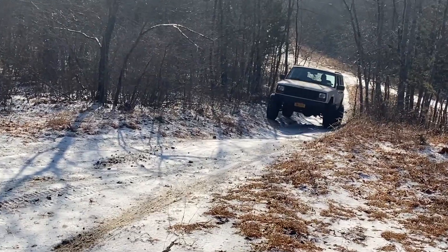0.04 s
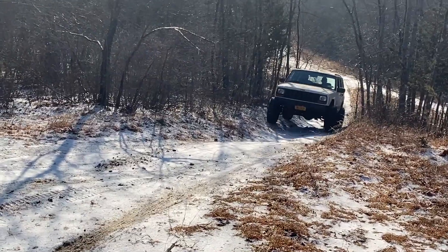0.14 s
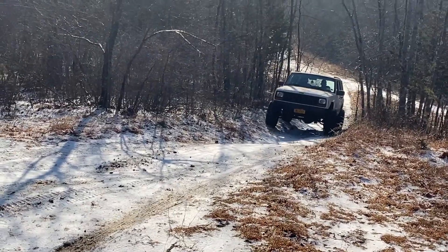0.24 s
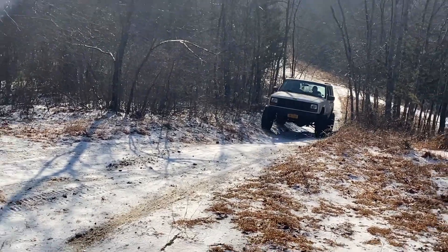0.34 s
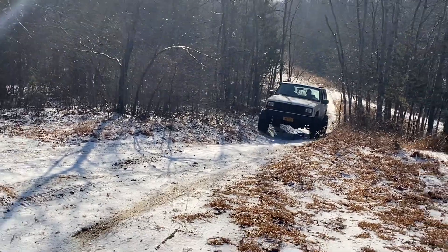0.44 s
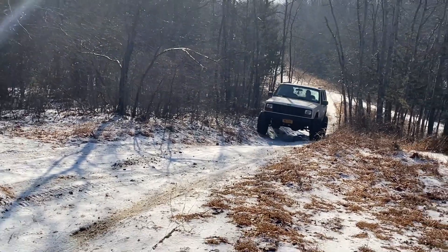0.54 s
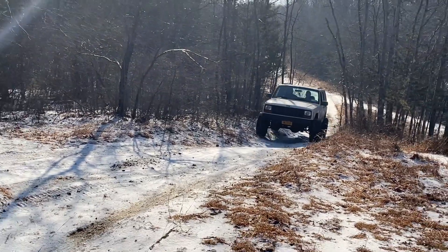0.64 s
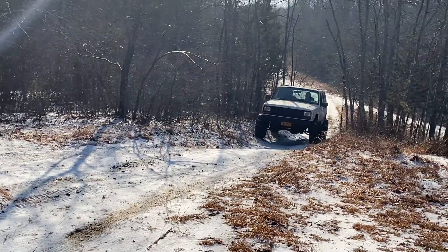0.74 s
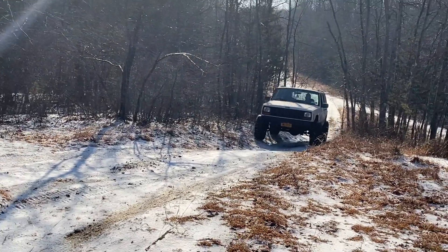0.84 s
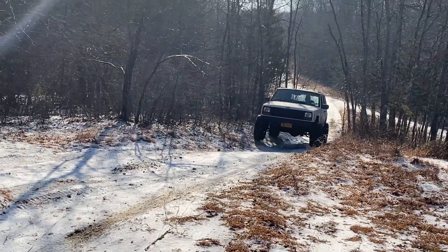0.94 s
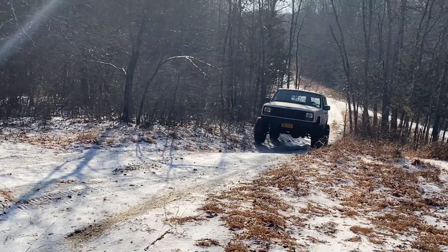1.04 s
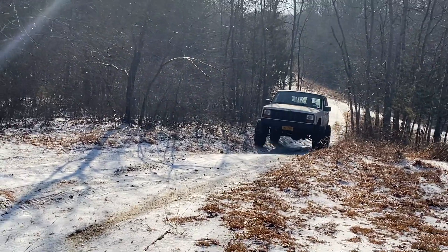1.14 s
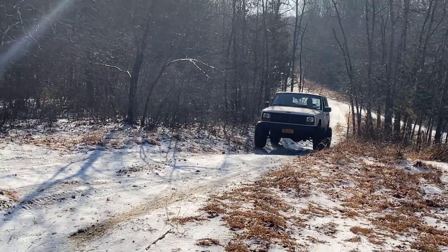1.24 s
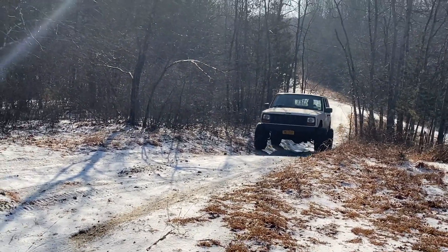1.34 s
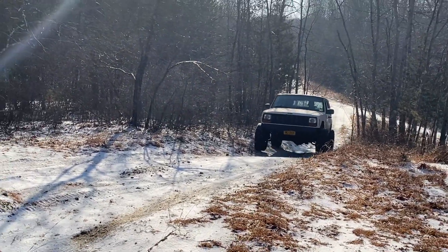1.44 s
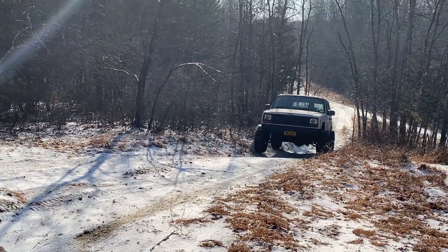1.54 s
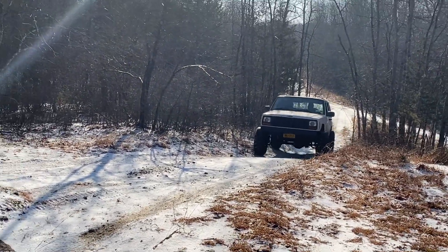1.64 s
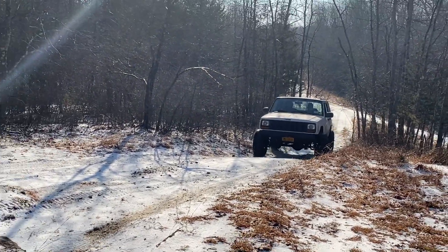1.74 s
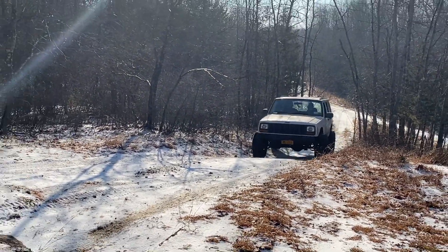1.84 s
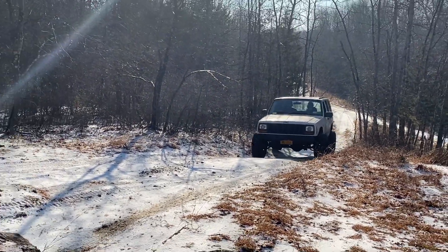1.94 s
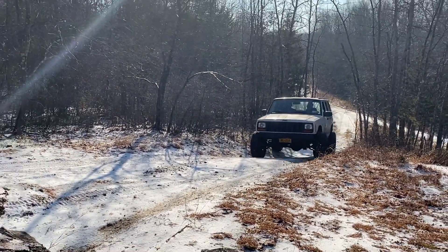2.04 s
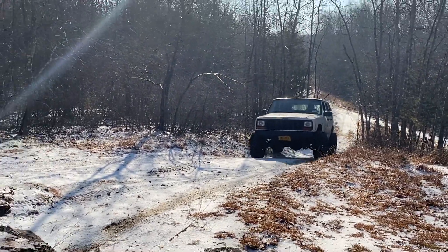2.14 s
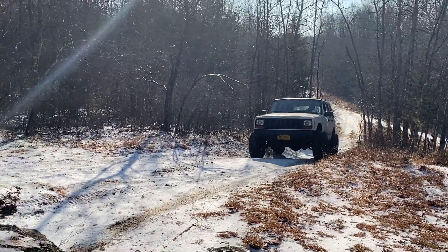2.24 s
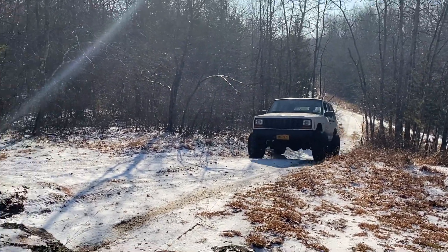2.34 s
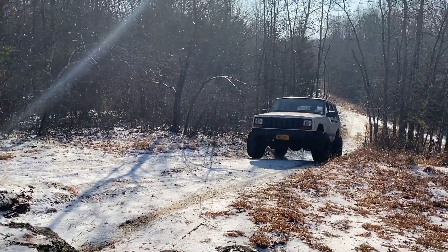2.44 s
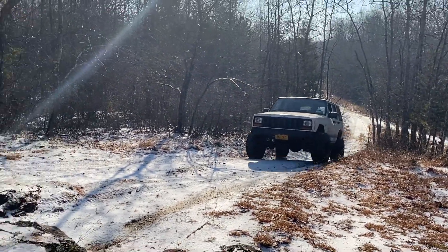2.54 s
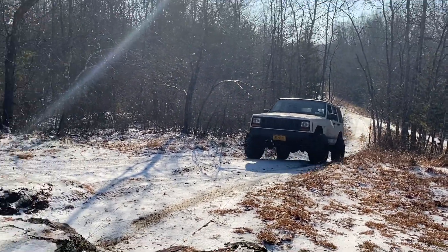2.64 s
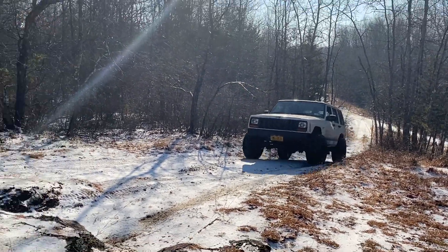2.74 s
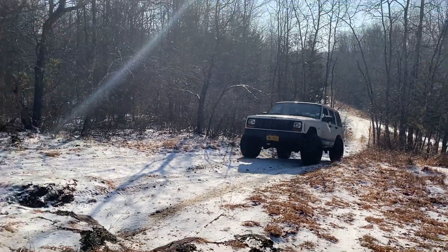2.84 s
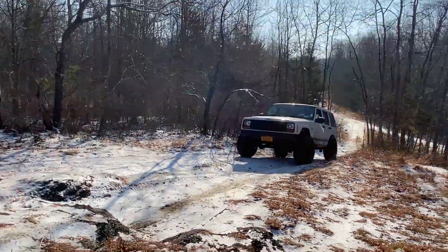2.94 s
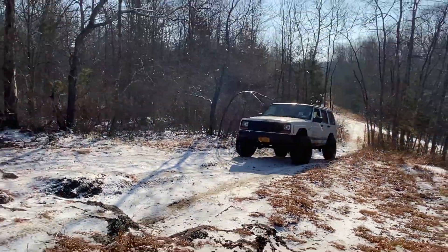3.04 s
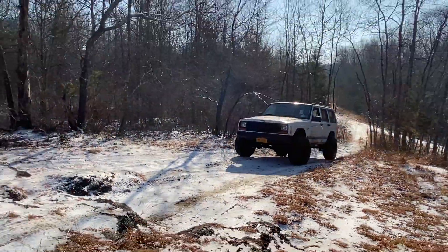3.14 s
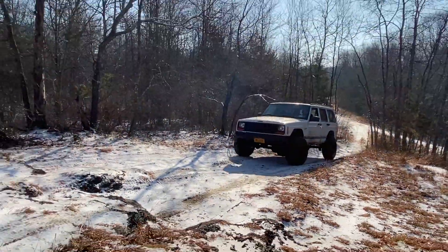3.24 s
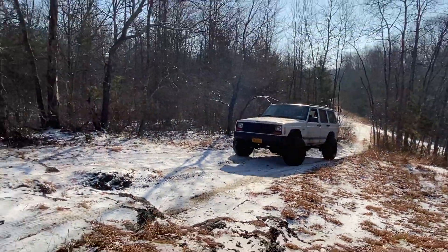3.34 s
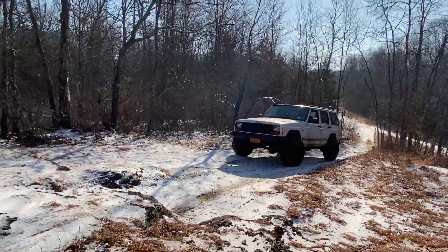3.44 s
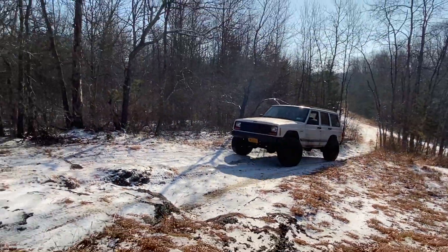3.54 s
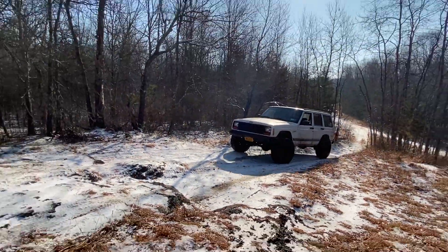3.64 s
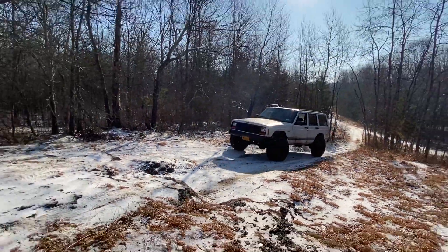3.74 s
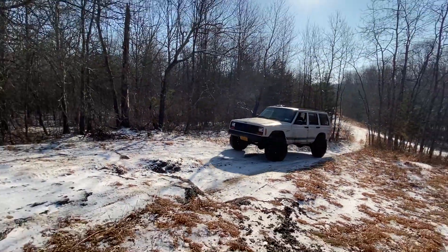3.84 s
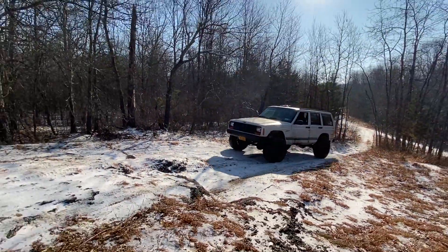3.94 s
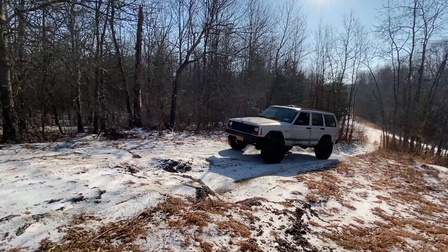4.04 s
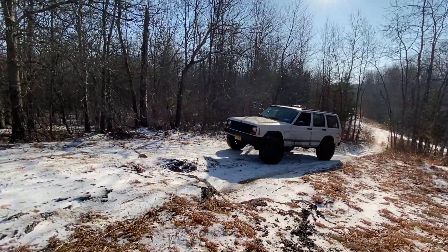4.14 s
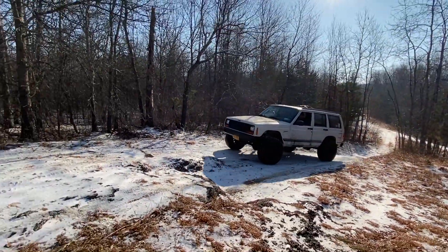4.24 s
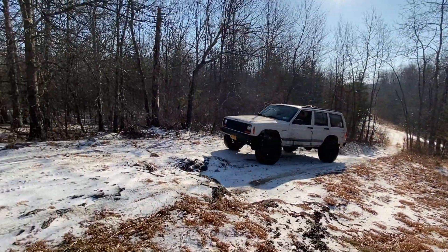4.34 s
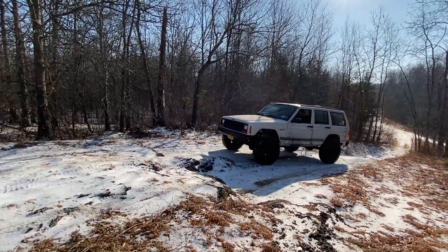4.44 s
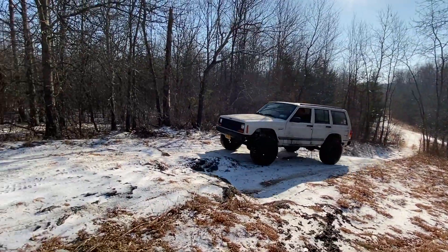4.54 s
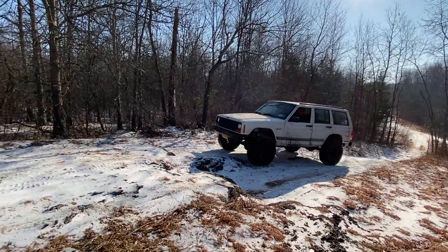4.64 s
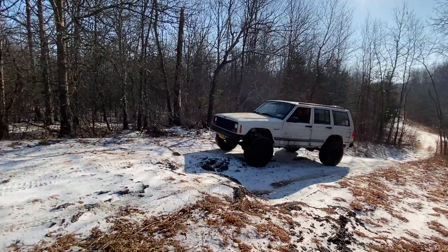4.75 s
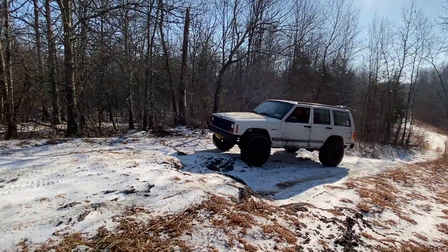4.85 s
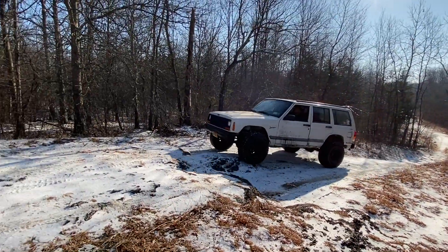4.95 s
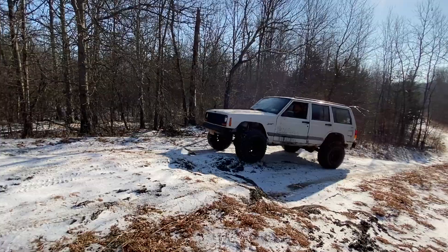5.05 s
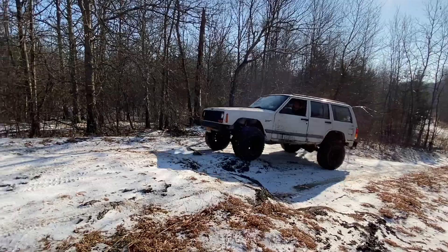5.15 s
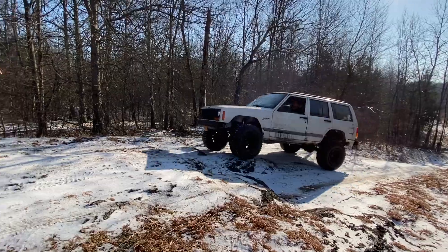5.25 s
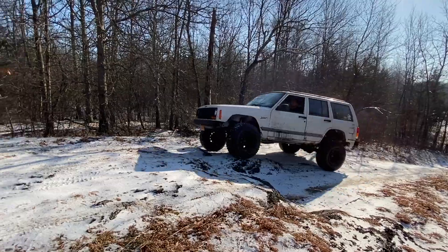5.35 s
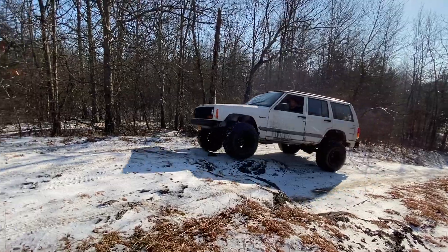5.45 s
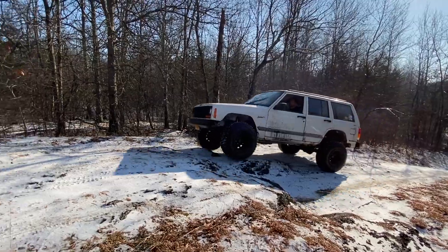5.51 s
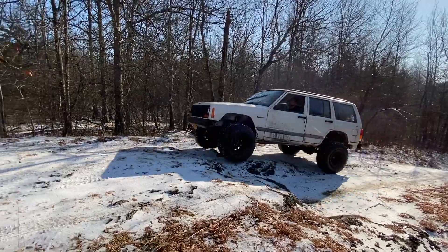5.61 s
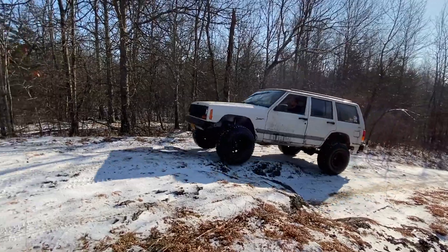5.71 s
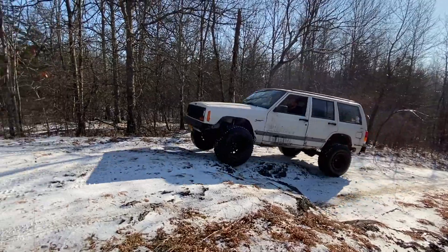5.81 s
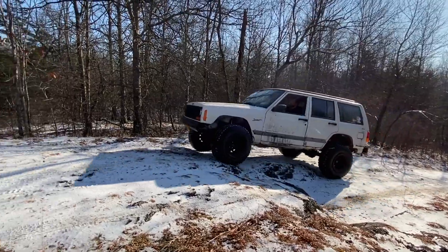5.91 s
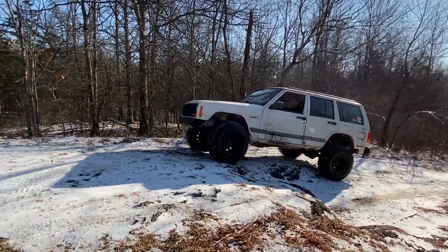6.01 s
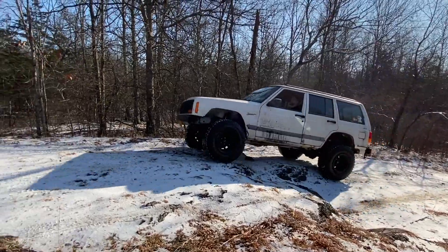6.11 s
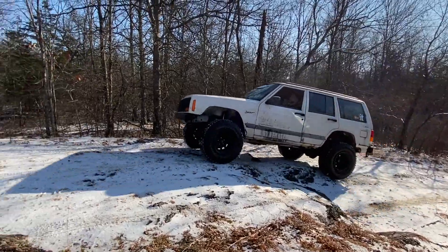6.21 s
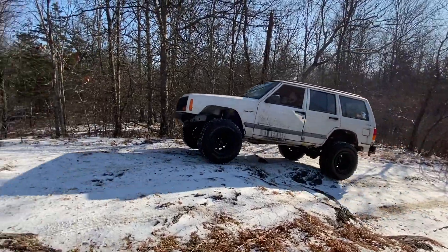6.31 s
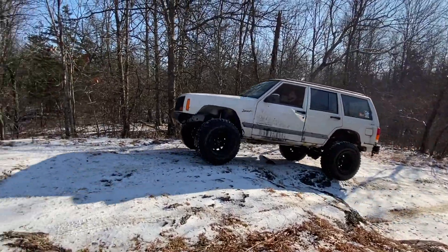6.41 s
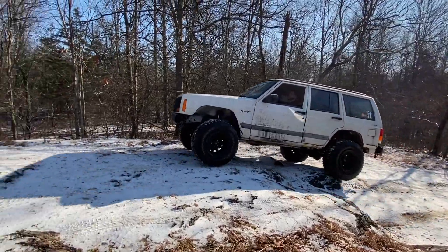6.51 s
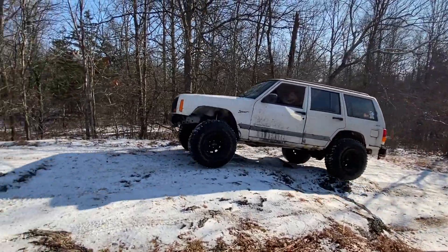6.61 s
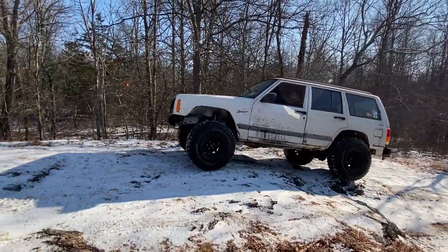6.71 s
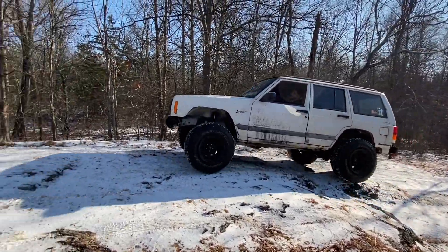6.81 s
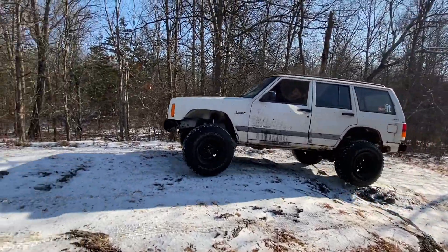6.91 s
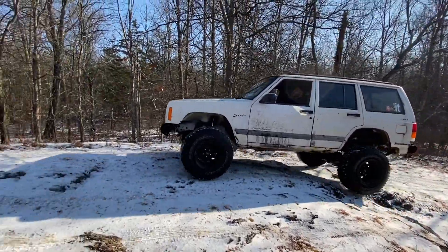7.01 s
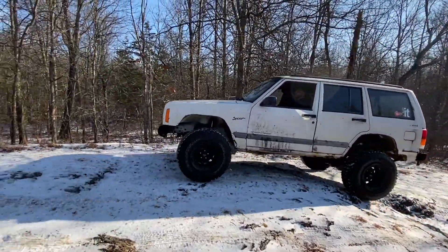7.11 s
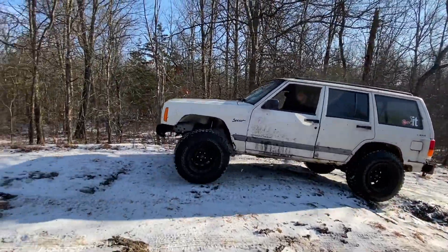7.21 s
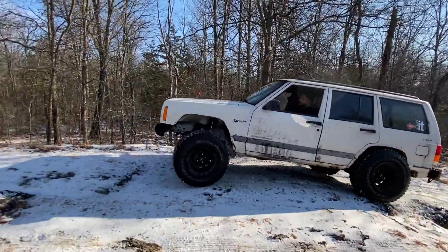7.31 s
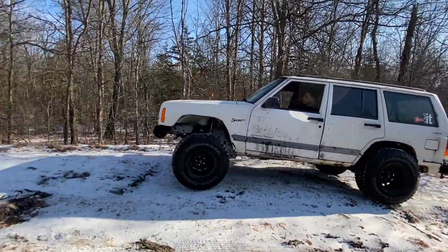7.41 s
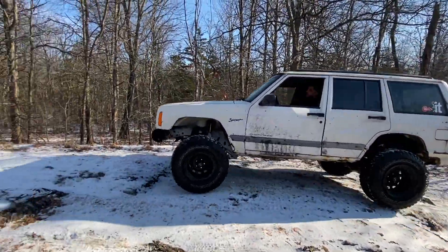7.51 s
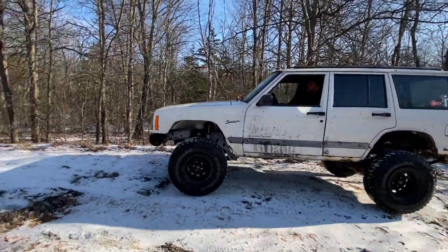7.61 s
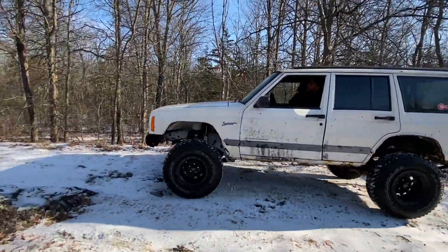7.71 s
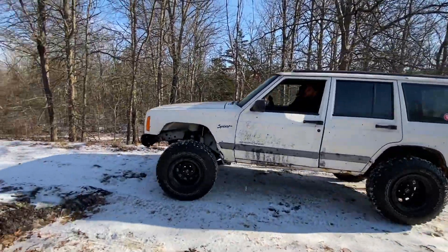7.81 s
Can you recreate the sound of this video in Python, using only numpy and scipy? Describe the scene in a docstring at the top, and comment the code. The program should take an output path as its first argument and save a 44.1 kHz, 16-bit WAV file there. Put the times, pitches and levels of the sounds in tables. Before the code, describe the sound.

Low throaty engine burble approaches on a snowy woodland trail, tyres crunching crust, throttle lifting with exhaust pops, then suspension thumps close by.

```python
"""Six-cylinder exhaust of an off-roader on a snowy woodland trail, nearing from about 16 m to 5 m.
Firing-locked tones and noise puffs boom under load; uneven pulses ring the pipe when the throttle shuts.
Ticking excites block resonances and noise makes gas hiss; noise grains pack snow and break its crust.
Filtered blows and bursts make chassis and ice sounds; modes jingle, a tone squeaks, trees echo thinly."""
import sys
import numpy as np
from scipy import signal
from scipy.fft import rfft, irfft
from scipy.io import wavfile
from scipy.ndimage import uniform_filter1d

SR = 44100
rng = np.random.default_rng(int(sys.argv[2]) if len(sys.argv) > 2 else 0)


def generate_wav(sig):
    """Save sig (samples, or channels by samples) to the path in sys.argv[1] as 16-bit PCM at SR."""
    pcm = np.round(np.clip(np.atleast_2d(sig).T, -1, 1) * 32767).astype(np.int16)
    wavfile.write(sys.argv[1], SR, pcm)


N = 347067
T = np.arange(N) / SR


def undb(db):
    """Decibels to gain."""
    return np.exp(np.asarray(db) * (np.log(10) / 20))


def unit(x):
    """Scale to rms 1."""
    return x / np.sqrt(np.mean(x ** 2))


def level(x, db):
    """Scale by dB over the standard deviation of the mid."""
    return x * undb(db) / x.mean(axis=0).std()


def pan(x, left_over_right_db):
    """Level difference between the channels, split evenly."""
    return x * undb(left_over_right_db * np.array([[.5], [-.5]]))


def curve(table):
    """Two-column table as a value per sample."""
    s, values = np.transpose(table)
    return np.interp(T, s, values)


def plateau(start, end, rise_s, fall_s):
    """Ramp reaching 1 at the start, held, falling after the end."""
    return np.clip(np.minimum((T - start) / rise_s, (end - T) / fall_s) + 1, 0, 1)


def swell(s, half_s):
    """Gaussian bump of height 1."""
    away = ((T - s) / half_s) ** 2
    return np.exp(-away, where=away < 20, out=np.zeros(N))


def walk(rate, size=N):
    """Smooth random drift with a spread near 1."""
    k = max(int(SR / rate), 2)
    steps = np.repeat(rng.standard_normal(size // k + 1), k)
    return 1.86 * uniform_filter1d(uniform_filter1d(steps, k), k)[:size]


def noise(side_db, size=N):
    """White stereo noise, mid rms 1."""
    mid, side = rng.standard_normal((2, size))
    return mid + undb(side_db) * np.array([side, -side])


def colour(x, points, size=4096):
    """Minimum-phase filter of the given spectrum, via the folded cepstrum."""
    hz, db = np.transpose(points)
    f = np.maximum(np.fft.rfftfreq(size, 1 / SR), 1)
    cepstrum = irfft(np.log(undb(np.interp(np.log(f), np.log(hz), db))))
    cepstrum[1:size // 2] *= 2
    cepstrum[size // 2 + 1:] = 0
    response = irfft(np.exp(rfft(cepstrum)))
    return signal.fftconvolve(np.atleast_2d(x), response[None], axes=1)[:, :np.shape(x)[-1]]


def resonate(x, hz, width_hz):
    """One resonance, gain 1 at its centre."""
    return signal.lfilter(*signal.iirpeak(hz, hz / width_hz, fs=SR), x)


def grains(rate, spread_db, grain_s):
    """Envelope of dense little fractures: most small, a few large."""
    size_db = spread_db * np.minimum(rng.exponential(size=N), 5)
    hits = (rng.random(N) < rate / SR) * undb(size_db)
    energy = signal.lfilter([1], [1, -np.exp(-2 / (grain_s * SR))], hits ** 2)
    return np.sqrt(unit(energy) + 1e-9)


def blows(table, spectrum, tail_db, tail_s, gain_db):
    """Impulses through a body's colour, each trailed by decaying noise."""
    out = np.zeros((2, N + SR))
    t = np.arange(SR // 8) / SR
    for s, db in table:
        push = (t == 0) + noise(-3, len(t)) * undb(tail_db - 60 * t / tail_s)
        blow = colour(push, spectrum)
        start = int((s + .0015) * SR)
        out[:, start:start + len(t)] += blow * undb(db + gain_db) / np.abs(blow).max()
    return out[:, :N]


def bursts(table, spectrum, side_db, rise_s, rough_db, gain_db):
    """Crumbling decaying noise bursts through a body's colour."""
    out = np.zeros((2, N + SR))
    t = np.arange(SR // 4) / SR
    for s, db, ring_s in table:
        decay = undb(-60 * t / ring_s + rough_db * walk(302, size=len(t)))
        envelope = (1 - np.exp(-t / rise_s)) * decay
        burst = colour(noise(side_db, len(t)) * envelope, spectrum)
        start = int(s * SR)
        out[:, start:start + len(t)] += burst * undb(db + gain_db) / np.abs(burst).max()
    return out[:, :N]


# firing overtones [multiple, level/dB, share of throttle drop]
OVERTONES = [(2, 0, 0.2), (3, -6.5, 0.25), (4, -1.5, 0.55), (5, -8.5, 0.34), (7, -9.5, 0.35)]
# tailpipe response to overtones [f/Hz, level/dB]
TAILPIPE_RESPONSE = [(85, -24.5), (112, -26), (132, -23.5), (144, -22.5), (162, -17.5), (182, -13),
                     (194, -30), (215, -27.5), (240, -36), (264, -26.5), (292, -31), (306, -34.5),
                     (322, -50.5), (356, -32), (400, -38), (460, -39), (515, -39), (545, -58)]
# overtone swells and fades as the load shifts [t/s, half length/s, multiple, change/dB]
OVERTONE_SWELLS = [(2.595, 0.19, 4, 7.5), (3.101, 0.16, 3, 11), (3.058, .2, 4, -6), (3.993, 0.69, 7, 3.5),
                   (4.1, 0.76, 5, -4), (4.599, 1, 3, 2), (5.22, 0.051, 3, 9.5), (5.287, 0.066, 4, 12),
                   (5.66, 0.037, 2, 5), (5.725, .06, 3, -7), (5.71, 0.024, 5, 11.5), (7.755, 0.3, 4, 5),
                   (6.5, 0.81, 3, -18), (6.899, 0.18, 5, 26), (6.9, 0.19, 7, 8.5), (7.821, 0.17, 2, -10)]
BOOM_DB, BOOM_WAVER_DB = -9.5, .3
# overtones turn over in phase across the pipe's main resonance
TURN_HZ, TURN_HALF_WIDTH_HZ = 163, 12


def firing_tones(angle, hz, near_db, lift_db):
    """Firing tone and overtones, weighted by the tailpipe resonances they cross."""
    tones = undb(BOOM_DB + near_db - lift_db + BOOM_WAVER_DB * walk(16)) * np.cos(angle)
    for k, own_db, lift_share in OVERTONES:
        pipe_db = np.interp(k * hz, *np.transpose(TAILPIPE_RESPONSE))
        db = own_db + pipe_db + near_db - lift_share * lift_db
        for s, half_s, multiple, change_db in OVERTONE_SWELLS:
            if multiple == k:
                db = db + change_db * swell(s, half_s)
        lag = np.pi / 2 + np.arctan((k * hz - TURN_HZ) / TURN_HALF_WIDTH_HZ)
        tones = tones + undb(db + .18 * k * walk(25)) * np.cos(k * angle - lag)
    return np.sqrt(2) * tones


# tones of unequal cylinders [multiple of firing rate, level/dB]
CYLINDER_TONES = [(2/3, -13), (4/3, -11), (5/3, -5), (7/3, -8), (5/2, -5), (8/3, -3), (10/3, -8),
                  (7/2, -13), (11/3, -2), (13/3, -14), (14/3, -14), (17/3, -16), (6, -17)]
# silencer response to those tones [f/Hz, level/dB]
SILENCER_RESPONSE = [(40, 6), (120, 6.5), (180, 6.5), (210, 5.5), (235, 3.5), (262, 6), (300, -9),
                     (360, -12), (420, -5), (500, 3), (580, -11)]


def cylinder_tones(angle, hz):
    """Weak tones of unequal cylinders, lifted by silencer resonances; rms 1."""
    tones = 0
    for k, db in CYLINDER_TONES:
        silencer_db = np.interp(k * hz, *np.transpose(SILENCER_RESPONSE))
        drift = 2 * np.pi * rng.random() + .15 * walk(10)
        tones = tones + undb(db + silencer_db + 2 * walk(6.3)) * np.cos(k * angle + drift)
    return unit(tones)


# puff spectrum [f/Hz, density/dB per Hz]
PUFF_SPECTRUM = [(20, -36), (45, 8.5), (90, 1), (180, -0.5), (290, -1.5), (400, -7.5), (600, -24.5),
                 (1200, -51)]
# offsets from the burble level; share of throttle drop
CYLINDER_DB, PUFFS_DB, LIFT_PUFFS = 1.2, -5.5, .2


def exhaust(cycle, hz, near_db, lift_db, burble_db):
    """Firing tones, unequal-cylinder tones and one turbulent puff per firing."""
    angle = 2 * np.pi * cycle + .025 * walk(45)
    tones = firing_tones(angle, hz, near_db, lift_db)
    lumps = undb(burble_db + CYLINDER_DB) * cylinder_tones(angle, hz)
    puffs = colour(noise(-17) * (1 + .56 * np.cos(angle)), PUFF_SPECTRUM)
    return tones + lumps + level(puffs, burble_db + PUFFS_DB - LIFT_PUFFS * lift_db)


# pipe resonances [f/Hz, width/Hz before the 1.65 broadening, level/dB]
PIPE_MODES = [(72, 24, 3), (152, 34, 0), (195, 35, -8), (275, 45, -11), (410, 70, -17), (520, 80, -28)]


def ring_pipe(pulses, tilt_db=0):
    """Pulses ring the exhaust pipe; each mode is a resonance applied twice."""
    out = 0
    for i, (hz, width_hz, db) in enumerate(PIPE_MODES):
        broad_hz = 1.65 * width_hz
        out = out + undb(db + i * tilt_db) * resonate(resonate(pulses, hz, broad_hz), hz, broad_hz)
    return out


# uneven coasting [from t/s, to t/s, level/dB, added level per higher pipe mode/dB]
OVERRUNS = [(2.72, 2.97, -32, -.5), (5.27, 5.66, -36.5, -3)]
# loud late firings [t/s, peak level/dB]
POPS = [(2.873, -30), (2.967, -20), (5.384, -21.5), (5.484, -20), (5.514, -16.5), (5.617, -24),
        (5.652, -27)]


def overrun(cycle):
    """Throttle shut: firings of random timing and strength ring the pipe, with loud pops."""
    firings = np.flatnonzero(np.diff(cycle.astype(int)))
    late, size = rng.standard_normal((len(firings), 2)).T
    place = np.clip(firings + (.0016 * SR * late).astype(int), 0, N - 1)
    pulses = np.zeros(N)
    pulses[place] = undb(4 * np.minimum(size, 1.3))
    out = np.zeros(N)
    for start, end, db, tilt_db in OVERRUNS:
        burble = ring_pipe(pulses * plateau(start, end, .06, .06), tilt_db)
        out += undb(db) * burble / burble[(T > start) & (T < end)].std()
    pop = ring_pipe(signal.unit_impulse(SR // 4))
    for s, db in POPS:
        start = int(s * SR)
        out[start:start + len(pop)] += undb(db) * pop / np.abs(pop).max()
    return out


# block resonances [f/Hz, width/Hz, level/dB, change while screened/dB]
BLOCK_MODES = [(800, 260, -3.5, -10), (1335, 225, 4.5, -13), (1500, 100, -8, -10), (1880, 130, -4, -6),
               (2040, 170, -2, -11), (2570, 110, -14, 3), (3180, 140, -8.5, 0), (3540, 170, -12, -1),
               (4150, 400, -15, -6), (5700, 110, -19, 0)]
# block drift as the vehicle turns and tilts [t/s, frequency ratio]
BLOCK_DRIFT = [(2.4, .95), (3.2, .995), (3.9, 1.015), (4.6, 1.0), (5.2, 1.0), (5.9, 1.025), (7, 1.02)]
# screening fades out as the vehicle turns its flank
SCREEN_FADE_S = (1.6, 2.9)


def valves(cycle, chatter_db):
    """Firing-locked ticks of unequal strength ring the drifting block resonances."""
    # filter on a warped time axis, then read back: the fixed modes drift
    place = np.cumsum(curve(BLOCK_DRIFT))
    cycle = np.interp(np.arange(N), place, cycle)
    firing = cycle.astype(int)
    random_db = 2 * rng.standard_normal(firing[-1] + 1)[firing]
    strength = undb(random_db + 2.5 * np.cos(2 * np.pi * firing / 6))
    ticks = noise(-4) * (.42 + strength * np.exp(-(cycle % 1) / .25))
    screened = np.interp(T, SCREEN_FADE_S, [1, 0])
    block = 0
    for hz, width_hz, db, screen_db in BLOCK_MODES:
        mode = resonate(resonate(ticks, hz, width_hz), hz, width_hz)
        block = block + undb(db + screened * screen_db) * mode
    chatter = np.array([np.interp(place, np.arange(N), side) for side in block])
    return level(chatter, chatter_db)


# gas spectrum [f/Hz, density/dB per Hz]
GAS_SPECTRUM = [(1500, -26), (2500, 5), (2850, 3), (3300, 3), (4500, 3), (6500, 3), (9000, -6), (11500, 0),
                (13000, -24), (15500, -5)]


def gas(cycle, hiss_db):
    """Hiss of rushing gas, pulsing with the firings."""
    pulse = 1 + .087 * np.cos(2 * np.pi * cycle)
    return level(colour(noise(.1) * pulse, GAS_SPECTRUM), hiss_db)


WHINE_S, WHINE_HALF_S, WHINE_MULTIPLE, WHINE_DB = 2.08, .15, 20.7, -58


def whine(cycle):
    """Brief accessory tone at a fixed multiple of the firing rate."""
    envelope = undb(WHINE_DB + 2 * walk(30)) * swell(WHINE_S, WHINE_HALF_S)
    return envelope * np.sqrt(2) * np.sin(2 * np.pi * WHINE_MULTIPLE * cycle)


# snow bites [peak t/s, rise/s, fall/s, level/dB]
BITES = [(1.1, 0.13, 0.29, 4.5), (2.25, 0.34, 0.39, 5.5), (2.63, 0.12, 0.48, 8.5), (4.95, 0.23, 0.25, 5),
         (6.05, 0.47, 0.18, 1.5), (6.52, 0.3, 0.22, 5.5), (7.36, 0.39, 0.21, 11), (7.8, 0.22, 0.29, 11)]
# snow, crust and grit spectra [f/Hz, density/dB per Hz]
PACKED_SNOW = [(150, -2.5), (350, 4.5), (550, -1.5), (800, -1), (1100, -10), (1700, -19.5), (3000, -31.5)]
CRUST = [(500, -18), (900, 3), (1150, -2), (1400, 1), (1700, -4), (2000, 0), (2400, -2), (2850, -5),
         (3300, -1.5), (5000, -8), (6800, -10), (9000, -18), (15000, -45)]
GRIT_SPECTRUM = [(700, -17), (2000, 9), (4500, 1.5), (6500, 0), (10000, -15), (15000, -20)]
# (level/dB at reference distance, share of 1/r law, share of bite)
GROAN, CRUNCH = (-36, .92, .77), (-51, .054, .81)
# crust grains; level relative to the crunch
SNAP_RATE_HZ, SNAP_SPREAD_DB, SNAP_DB = 260, 2.2, -11


def tyres(near_db, hush_db):
    """Snow packs in low grains and its crust breaks in fine ones; both swell at each bite."""
    bite_db = 0
    for s, rise_s, fall_s, db in BITES:
        bite_db = bite_db + db * swell(s, np.where(T < s, rise_s, fall_s))
    groan_db, crunch_db = (db + near * near_db + bite * bite_db - hush_db
                           for db, near, bite in (GROAN, CRUNCH))
    packing = .37 + grains(rate=230, spread_db=3, grain_s=.017)
    breaking = .7 + grains(rate=500, spread_db=4, grain_s=.002)
    groan = colour(noise(-8.5) * packing, PACKED_SNOW)
    crunch = colour(noise(.047) * breaking, CRUST)
    snap_chance = SNAP_RATE_HZ / SR * np.clip(bite_db / 5, 0, 1)
    snap_db = SNAP_SPREAD_DB * np.minimum(rng.exponential(size=N), 3)
    snaps = (rng.random(N) < snap_chance) * undb(snap_db)
    crackle = colour(snaps * rng.uniform(0, 1, (2, N)), GRIT_SPECTRUM)
    return level(groan, groan_db) + level(crunch, crunch_db) + level(crackle, crunch_db + SNAP_DB)


# body thumps [t/s, level/dB before gain_db, ring/s]
THUMPS = [(3.244, -22, 0.18), (5.594, -27, 0.036), (7.188, -18, 0.082), (7.33, -16.5, 0.19),
          (7.45, -18, 0.069)]
# body boom [f/Hz, density/dB per Hz]
THUD = [(30, -12), (70, -3), (180, 1.5), (300, -4.5), (420, -13), (700, -23.5), (1500, -73)]


def thumps():
    """Body booms dully on its suspension: low noise bursts."""
    return bursts(THUMPS, THUD, side_db=-25, rise_s=.0021, rough_db=-1.5, gain_db=6.5)


# chassis knocks [t/s, level/dB before gain_db]
KNOCKS = [(2.056, -23.5), (2.315, -17.5), (2.339, -12.5), (2.449, -28), (2.58, -26), (2.687, -27),
          (3.65, -28), (3.677, -25), (3.719, -28.5), (5.445, -28), (5.595, -25), (6.468, -22.5),
          (6.887, -26), (7.509, -16)]
# chassis colour [f/Hz, density/dB per Hz]
KNOCK = [(100, -32), (350, -1.5), (600, 2.5), (800, 3), (1100, -12), (1500, -26), (2200, -50), (5000, -62),
         (12000, -71)]


def knocks():
    """Chassis struck sharply, with a loose rattling tail."""
    return blows(KNOCKS, KNOCK, tail_db=-35, tail_s=.13, gain_db=5)


# suspension clanks [t/s, level/dB before gain_db, ring/s]
CLANKS = [(2.867, -29, .07), (5.466, -20.5, .07), (6.079, -20, .05), (6.092, -25, .07)]
# link colour [f/Hz, density/dB per Hz]
CLANK = [(300, -14), (680, 4), (900, 3), (1130, -4), (1450, 1), (1750, -6), (2050, -6), (2600, -18),
         (5000, -22), (12000, -42)]


def clanks():
    """Suspension links clank: fast-rising rough bursts."""
    return bursts(CLANKS, CLANK, side_db=-6, rise_s=.001, rough_db=2.5, gain_db=0)


# spring squeaks [start t/s, length/s, f/Hz, level/dB]
SQUEAKS = [(2.685, 0.025, 739, -33), (7.251, 0.011, 1201, -32), (7.367, 0.021, 776, -17),
           (7.389, 0.029, 1492, -38), (7.451, 0.038, 1268, -35.5)]


def squeaks():
    """A spring bush sticks and slips: short falling tones with their octaves."""
    out = np.zeros(N)
    waver = 1 + .0088 * walk(250)
    for s, length_s, hz, db in SQUEAKS:
        age = np.clip((T - s) / length_s, 0, 1)
        angle = 2 * np.pi * np.cumsum(hz * waver * (1 - .08 * (age - .5))) / SR
        envelope = undb(db) * np.sqrt(2 * np.abs(np.sin(np.pi * age)))
        out += envelope * (np.sin(angle) + undb(-13.5) * np.sin(2 * angle))
    return out


# jingles [t/s, drive level/dB, pitch ratio]
JINGLES = [(1.256, -32, 1.0), (4.994, -28, .995), (6.9428, -26.5, 1.005)]
# metal modes [f/Hz, level/dB, t60/s]
METAL_MODES = [(5700, -13, 0.04), (6420, -2, 0.06), (6540, -6, 0.06), (7120, -12, 0.04), (8252, -16, 0.06),
               (10650, -10, 0.04), (11300, -14, .03)]


def jingles():
    """A small metal piece: decaying noise shakes its ringing modes."""
    out = 0
    for s, db, pitch in JINGLES:
        age = np.maximum(T - s, 0)
        decay = undb(db - 60 * age / .19 + 3 * walk(300))
        shake = decay * (1 - np.exp(-age / .003)) * noise(-1)
        ring = 0
        for hz, mode_db, t60_s in METAL_MODES:
            width_hz = np.log(1000) / (np.pi * t60_s)
            ring = ring + undb(mode_db) * resonate(shake, pitch * hz, width_hz)
        out = out + undb(11) * ring + undb(-12) * resonate(shake, 6500, 7000)
    return out


# tread scrapes [t/s, level/dB before gain_db, ring/s]
SCRAPES = [(1.142, -26, .13), (2.618, -26, .12), (7.212, -22, .12), (7.287, -17.5, 0.19),
           (7.322, -18.5, 0.11)]
# scrape colour [f/Hz, density/dB per Hz]
SCRAPE = [(300, 10), (750, 5), (1100, 9.5), (1550, 7), (1800, 4.5), (2080, 12.5), (2450, -13), (3300, -2),
          (6000, 0), (9000, -25), (15000, -49)]


def scrapes():
    """Tread blocks scrape frozen ground: rough noise bursts."""
    return bursts(SCRAPES, SCRAPE, side_db=-3, rise_s=.0055, rough_db=1.5, gain_db=-1)


# frozen clods [t/s, level/dB before gain_db, ring/s]
CLODS = [(2.563, -29, .1), (2.624, -24, .2), (2.762, -28, .09), (4.807, -24, .07), (4.94, -29, .05),
         (4.957, -27, .03), (4.968, -26, .07), (5.142, -28, .05)]
# clod colour [f/Hz, density/dB per Hz]
CLOD = [(200, -14), (500, -3), (780, 2), (1050, -3), (1500, -10), (2500, -22), (8000, -45)]


def clods():
    """Frozen clods crumble under a tyre: mid-band bursts."""
    return bursts(CLODS, CLOD, side_db=-8, rise_s=.003, rough_db=1.5, gain_db=0)


# crust collapses [t/s, level/dB before gain_db, ring/s]
CRUNCHES = [(1.11, -34, 0.36), (1.147, -33, .14), (2.587, -31, 0.12), (2.62, -33, 0.084),
            (2.715, -31.5, 0.1), (2.78, -30.5, 0.18), (2.808, -35, 0.06), (4.803, -26, 0.092),
            (4.895, -31.5, 0.19), (4.97, -29, 0.074)]
# brittle crust colour [f/Hz, density/dB per Hz]
BRITTLE = [(800, -14), (2500, 3), (4200, 1), (5200, -1), (7000, -17), (14000, -37)]


def crust_collapses():
    """Patches of frozen crust give way: slow-rising brittle bursts."""
    return bursts(CRUNCHES, BRITTLE, side_db=-11, rise_s=.013, rough_db=2.5, gain_db=-2.5)


# ice cracks [t/s, level/dB before gain_db, ring/s]
CRACKS = [(0.0285, -31.5, 0.21), (0.321, -33, 0.18), (0.3857, -31.5, 0.07), (0.4037, -31.5, 0.15),
          (0.7164, -28, 0.056), (1.145, -27.5, 0.15), (4.8107, -28.5, 0.062), (5.5944, -42, 0.04),
          (6.2286, -30.5, 0.086), (7.2144, -23.5, 0.053), (7.4838, -24, 0.11), (7.5148, -20.5, 0.086)]
# ice colour [f/Hz, density/dB per Hz]
ICE = [(400, -50), (1500, 4), (3000, 7), (6000, 8), (9000, 1), (12000, -3), (15000, -6)]


def ice_cracks():
    """Ice cracks: bright, wide noise bursts."""
    return bursts(CRACKS, ICE, side_db=0, rise_s=.0035, rough_db=1.5, gain_db=2.5)


# grit ticks [t/s, level/dB before gain_db]
TICKS = [(0.0285, -28), (4.9762, -32), (5.1209, -34), (5.2506, -28), (5.288, -32), (5.294, -34),
         (5.595, -32), (6.654, -26), (7.2148, -24)]


def grit_ticks():
    """Grit ticks under the tread: bright impulses with short tails."""
    return blows(TICKS, GRIT_SPECTRUM, tail_db=-24, tail_s=.04, gain_db=4)


# twig snaps [t/s, level/dB before gain_db]
TWIGS = [(0.8846, -36), (1.0054, -32), (1.012, -34), (1.1465, -26), (2.5637, -33), (2.5692, -33),
         (2.6201, -31), (2.6819, -23.5), (6.5392, -18)]
# twig colour [f/Hz, density/dB per Hz]
TWIG = [(400, -20), (900, 6), (1800, 5.5), (3200, 2), (6000, -35), (14000, -87)]


def twigs():
    """Twigs snap: impulses with short noise tails."""
    return blows(TWIGS, TWIG, tail_db=-24.5, tail_s=.04, gain_db=4)


def woods(x, t60_s=.14, wet_db=-17):
    """Trunks scatter a thin echo: decaying coloured noise as impulse response."""
    t = np.arange(SR // 2) / SR
    scatter = rng.standard_normal((2, len(t))) * undb(-60 * t / t60_s) * (t > .012)
    echo = colour(scatter, [(150, -22), (600, -9), (2000, 2), (9000, -31)])
    echo *= undb(wet_db) / np.sqrt(np.sum(echo ** 2) / 2)
    return x + signal.fftconvolve(x, echo, axes=1)[:, :N]


def widen(x):
    """Treble starts nearly central and spreads around 3 s."""
    side = (x[0] - x[1]) / 2
    highpass = signal.butter(2, 1700, "high", fs=SR, output="sos")
    treble = signal.sosfiltfilt(highpass, side)
    width = undb(np.interp(T, [2.75, 3.1], [-18, .8]))
    return x + (width - 1) * treble * np.array([[1], [-1]])


# throttle lifts [shut t/s, reopening t/s, closing/s, opening/s, boom drop/dB]
LIFTS = [(2.78, 2.944, 0.17, 0.2, 9.5), (5.305, 5.645, 0.125, 0.095, 25)]


def throttle_drop_db():
    """Boom drop as the driver lifts off the throttle."""
    return sum(db * plateau(shut, reopen, closing_s, opening_s)
               for shut, reopen, closing_s, opening_s, db in LIFTS)


# engine speed [t/s, firing rate/Hz]
FIRING_RATE = [(0.0, 77.5), (0.26, 81.6), (0.5, 78.2), (0.81, 81.53), (1.14, 85.2), (1.4, 79.74),
               (1.71, 81.94), (1.95, 79.36), (2.24, 90.77), (2.69, 88.2), (2.98, 70.27), (3.11, 67.78),
               (3.4, 71.27), (3.94, 73.2), (4.43, 69.74), (5.11, 69.64), (5.19, 66.65), (5.52, 45.74),
               (5.61, 41.85), (5.65, 43.6), (5.71, 50.9), (5.76, 62.9), (5.81, 70.6), (5.9, 75.1),
               (6.01, 75.17), (6.25, 67.84), (6.51, 72.84), (6.9, 65.88), (7.26, 71.37), (7.5, 71.2),
               (7.87, 78.6)]
# vehicle distance [t/s, distance/m]
DISTANCE = [(0, 16.5), (.75, 14.8), (1.25, 17.7), (1.6, 13.8), (2.6, 13.3), (3.35, 9.2), (4.1, 7.84),
            (5, 6.77), (5.85, 5.18), (6.8, 5.38), (7.5, 4.7), (7.87, 5.15)]
REFERENCE_M, CRAWL_HZ = 5, 70
# (level/dB at reference distance and crawl, slope/dB per Hz of firing rate, share of 1/r law)
BURBLE, CHATTER, HISS = (-32.5, -.047, .45), (-46.3, .21, .095), (-48.5, .2, 1)
# shares of throttle drop
LIFT_BURBLE, LIFT_HISS, LIFT_TYRES = .17, .13, .14
# added hiss at full engine acceleration
PUSH_DB, PUSH_HZ_PER_S = 5, 36
# quieter rolling over smooth snow
SMOOTH_S, SMOOTH_HALF_S, SMOOTH_DROP_DB = 4.1, 1.15, 3.5


def scene():
    """Speed, throttle and distance drive the engine; the last two also the tyres; events are timed."""
    hz = curve(FIRING_RATE)
    cycle = np.cumsum(hz) / SR
    near_db = 20 * np.log10(REFERENCE_M / curve(DISTANCE))
    lift_db = throttle_drop_db()
    above_crawl_hz = np.maximum(hz - CRAWL_HZ, -8)
    burble_db, chatter_db, hiss_db = (db + slope * above_crawl_hz + near * near_db
                                      for db, slope, near in (BURBLE, CHATTER, HISS))
    burble_db = burble_db - LIFT_BURBLE * lift_db
    hz_per_s = uniform_filter1d(np.gradient(hz) * SR, size=SR // 8)
    push = np.clip(hz_per_s / PUSH_HZ_PER_S, 0, 1)
    hiss_db = hiss_db + PUSH_DB * push - LIFT_HISS * lift_db
    hush_db = LIFT_TYRES * lift_db + SMOOTH_DROP_DB * swell(SMOOTH_S, SMOOTH_HALF_S)

    tailpipe = exhaust(cycle, hz, near_db, lift_db, burble_db) + overrun(cycle)
    tailpipe = pan(tailpipe, np.interp(T, [2.5, 5], [-.6, -1.4]))
    machine = pan(valves(cycle, chatter_db), 2) + pan(gas(cycle, hiss_db), -2.5) + whine(cycle)
    rattles = knocks() + clanks() + squeaks() + jingles()
    ground = scrapes() + clods() + crust_collapses() + ice_cracks() + grit_ticks() + twigs()
    trail = woods(rattles + ground)
    return tailpipe + thumps() + widen(machine + tyres(near_db, hush_db) + trail)


def record(dry):
    """Band limits: high-pass at 22 Hz, steep low-pass at 15.85 kHz."""
    dry = signal.sosfilt(signal.butter(2, 22, "high", fs=SR, output="sos"), dry)
    return signal.sosfilt(signal.ellip(10, .1, 80, 15850, fs=SR, output="sos"), dry)


dry = scene()
out = record(dry)
generate_wav(out)
```